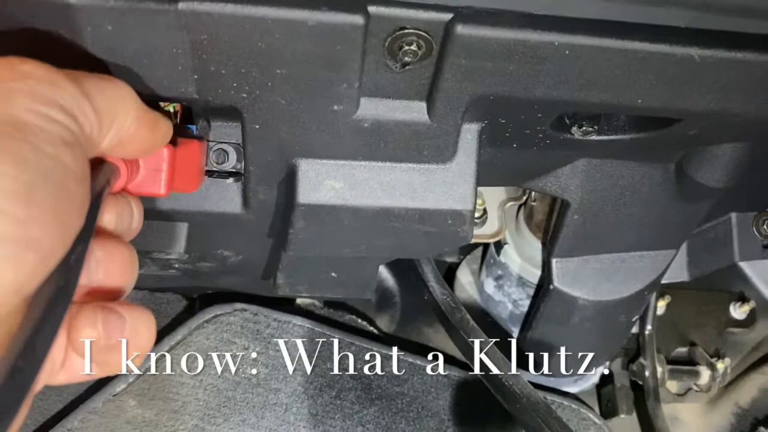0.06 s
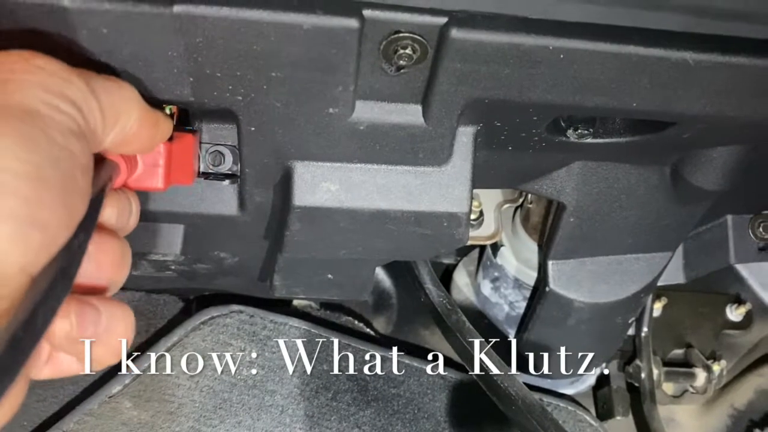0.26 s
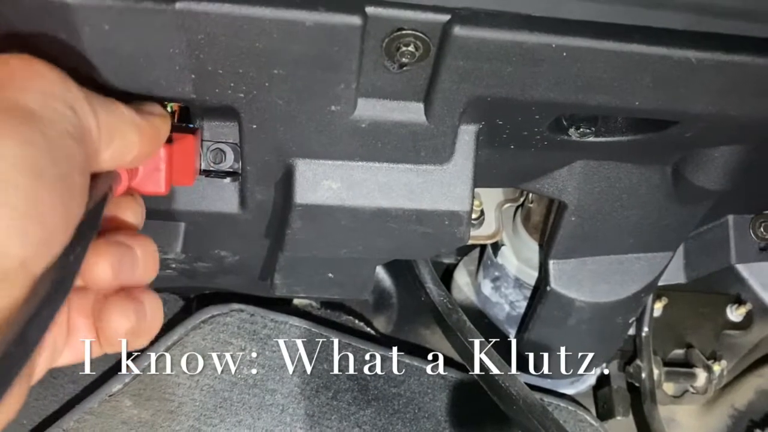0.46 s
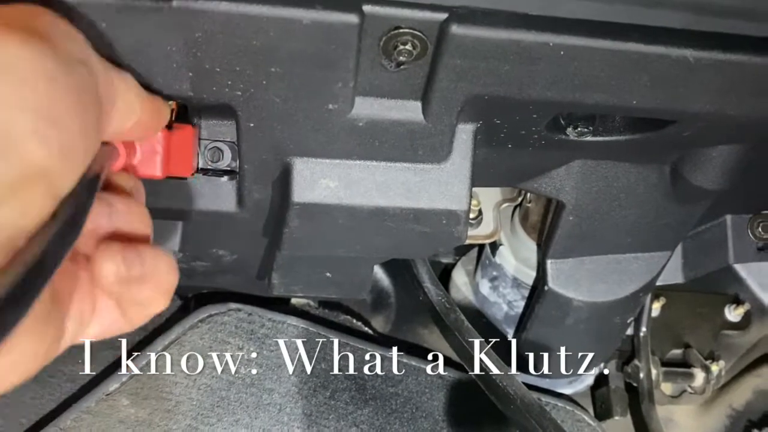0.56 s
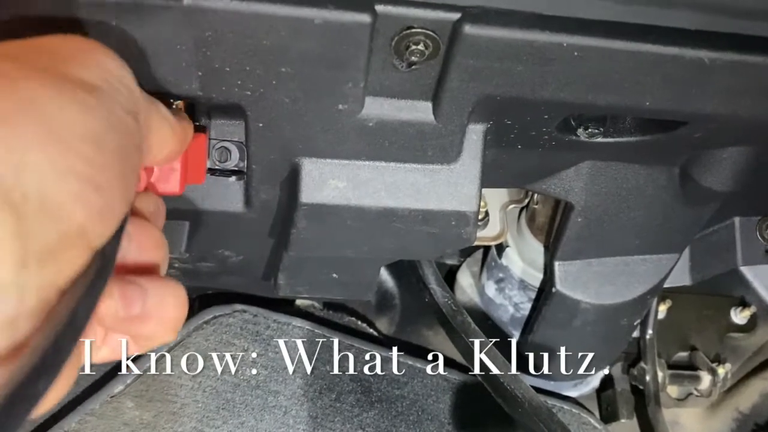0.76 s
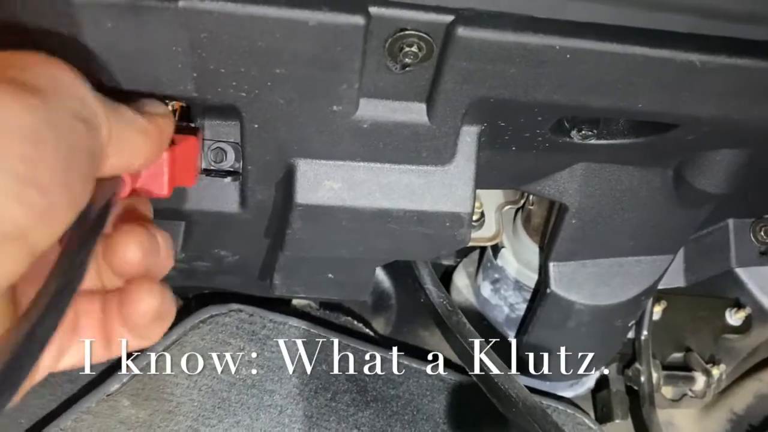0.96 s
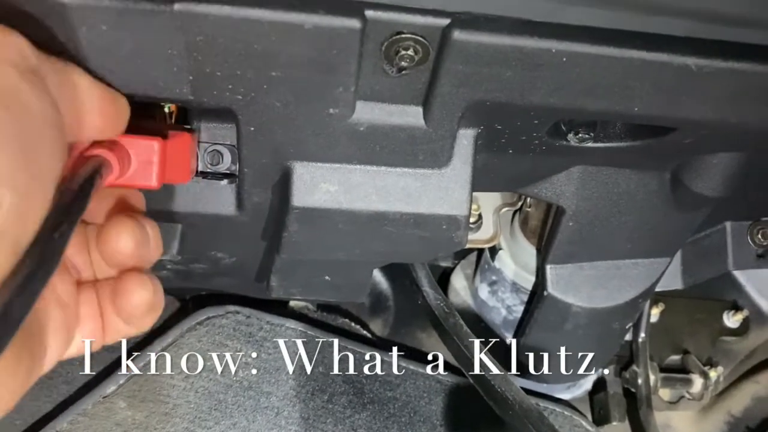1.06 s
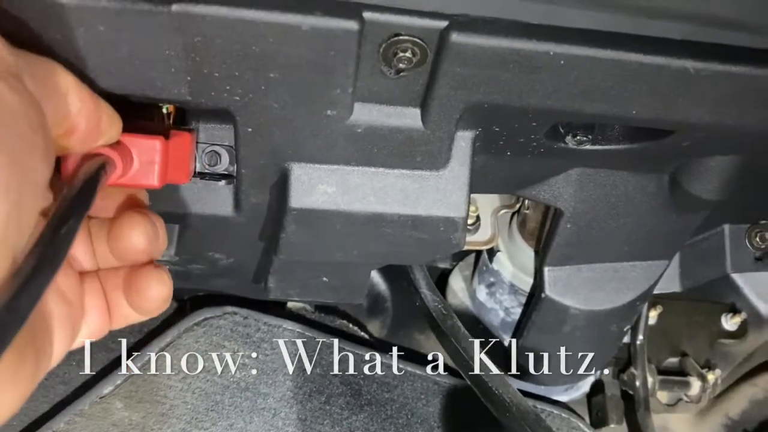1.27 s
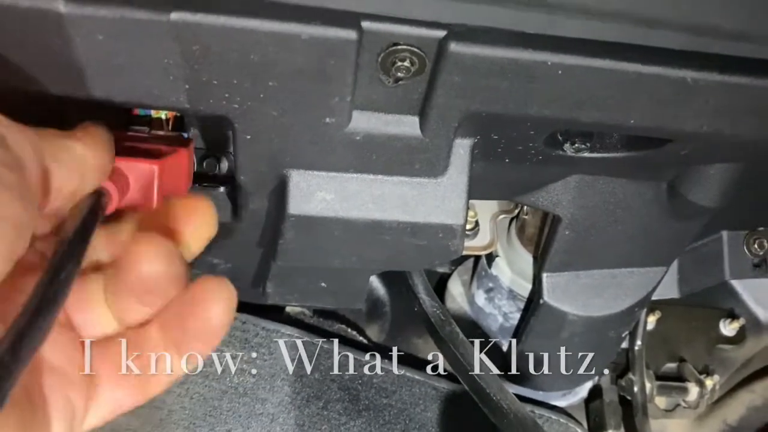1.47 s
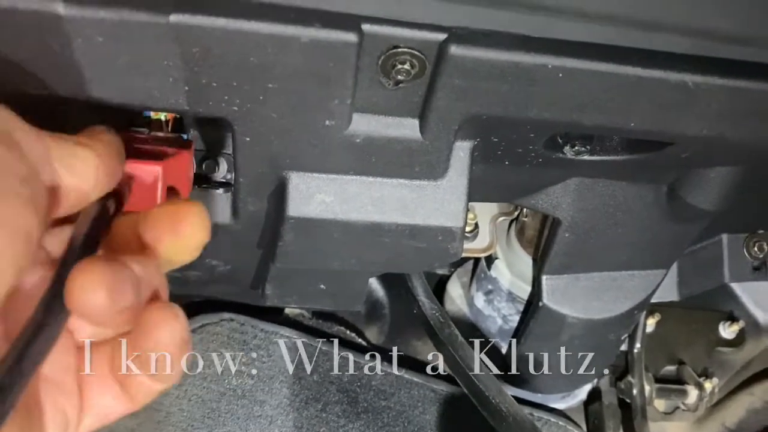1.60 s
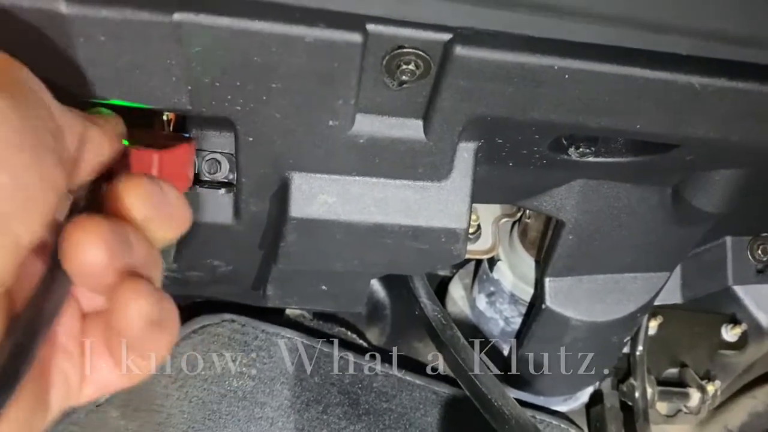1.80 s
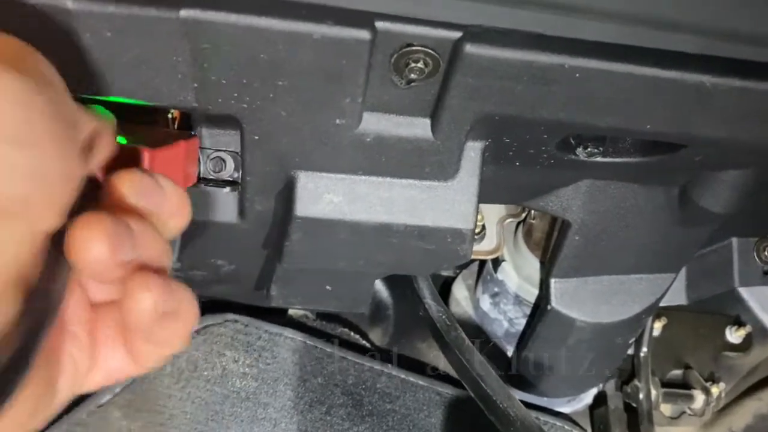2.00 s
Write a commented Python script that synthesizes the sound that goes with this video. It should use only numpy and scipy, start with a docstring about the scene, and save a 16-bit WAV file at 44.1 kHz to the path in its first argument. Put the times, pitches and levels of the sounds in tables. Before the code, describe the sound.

A plastic plug is worked in a socket, close to a stereo microphone: strong clacks and low panel thumps at the start, another cluster of clicks mid-way, then faint ticks and rubbing, over steady low vehicle cabin hum.

```python
"""A low cabin hum and rumble run throughout, under plastic rubbing: a plug is at a socket under a dashboard.
Close to a two-port microphone its shell ticks, scrapes on the rim and knocks home; a trim panel thumps.
Shaped noise makes rumble, hiss, rubbing, scrapes and clicks; sines make the hum and, decaying, ring the
shell, housing and panel. Short footwell reflections follow the clicks, shell rings and knocks only."""
import sys
import numpy as np
from scipy import signal
from scipy.fft import rfft, irfft, next_fast_len
from scipy.io import wavfile
from scipy.ndimage import map_coordinates

SR = 44100
rng = np.random.default_rng(int(sys.argv[2]) if len(sys.argv) > 2 else 0)


def persist_wave(psi):
    """Save psi, clipped to +-1, as 16-bit WAV."""
    counts = np.round(np.clip(psi, -1, 1) * 32767).astype(np.int16)
    wavfile.write(sys.argv[1], SR, np.atleast_2d(counts).T)


N = 90052  # length in samples


def amp(db):
    """Decibels to gain."""
    return 10 ** (np.asarray(db) / 20)


def unit(x):
    """Scale to rms 1."""
    return x / np.sqrt(np.mean(x ** 2) + 1e-20)


def along(points, hz):
    """Read (frequency, value) points on a logarithmic frequency axis."""
    point_hz, values = np.transpose(points)
    return np.interp(np.log(hz + 1), np.log(point_hz + 1), values)


def curves(rows):
    """One value per sample for each column after the time."""
    times, *columns = np.transpose(rows)
    return [np.interp(np.arange(N) / SR, times, column) for column in columns]


def wobble(rate):
    """A smooth random curve with this many knots a second."""
    knots = rng.standard_normal(int(N * rate / SR) + 4)
    return map_coordinates(knots, [np.arange(N) * rate / SR])


def swell(start, length):
    """A smooth rise and fall: half a sine over the length in seconds."""
    return np.sin(np.pi * np.clip((np.arange(N) / SR - start) / length, 0, 1))


def filtered(x, response):
    """Multiply the spectrum of x by a complex response of frequency."""
    size = next_fast_len(N + SR // 4)  # room for the filter to ring out
    spectrum = rfft(x, size) * response(np.fft.rfftfreq(size, 1 / SR))
    return irfft(spectrum, size)[..., :N]


# how alike the left and right ports hear a sound: (frequency [Hz], likeness [0 to 1])
LIKENESS = [(150, 1), (350, 0.83), (600, 0.12), (1000, 0.78), (3000, 0.44), (4800, .5), (7000, 1)]


def coloured(pair, spectrum):
    """Two unrelated signals become one stereo sound of rms 1, its ports alike by frequency."""
    def mid_side_response(hz):
        angle = np.arccos(np.clip(along(LIKENESS, hz), -1, 1)) / 2
        return amp(along(spectrum, hz)) * [np.cos(angle), np.sin(angle)]

    mid, side = filtered(pair, mid_side_response)
    return unit(np.array([mid + side, mid - side]))


def noise(spectrum):
    """Stereo noise of rms 1 with this spectrum."""
    return coloured(rng.standard_normal((2, N)), spectrum)


def strike(start, rise_s, t60):
    """Time since a blow, and its envelope: a fast rise, then a 60 dB fall in t60 seconds."""
    t = np.arange(N) / SR - start
    envelope = np.zeros(N)
    on = (t > 0) & (t < 2 * t60)
    envelope[on] = (1 - np.exp(-t[on] / rise_s)) * amp(-60 * t[on] / t60)
    return t, envelope


# spectrum of the cabin's rumble: (frequency [Hz], relative level [dB])
RUMBLE_SPECTRUM = [(13, -45), (22, -50), (42, -2.5), (81, 2), (114, 0.5), (168, -8), (193, -9.5), (248, -8),
                   (272, -13.5), (395, -28.5), (476, -27.5), (574, -36), (900, -53), (1170, -51),
                   (1980, -120)]
# slow rise and fall of the rumble: (time [s], level about RUMBLE_DB [dB])
RUMBLE_SWAY = [(0, 5.5), (.25, 1.5), (.7, -1.5), (1.25, 0), (1.5, 4), (1.7, 3), (1.9, 0.5), (2.04, 4)]
# steady tones of the hum: (frequency [Hz], rms level [dB])
HUM_TONES = [(102, -49), (116, -46.5), (242, -54.5)]
# spectrum of the faint hiss: (frequency [Hz], relative level [dB])
HISS_SPECTRUM = [(200, -14), (600, 5), (1500, -9), (5000, -15), (16000, -31.5)]
RUMBLE_DB, HISS_DB = -40, -71.5


def cabin(drift_rad=0.76):
    """All round the cabin: swaying low rumble, hum tones wavering in phase, and faint hiss."""
    t = np.arange(N) / SR
    hum = np.zeros(N)
    for hz, db in HUM_TONES:
        phase = 2 * np.pi * hz * t + drift_rad * wobble(8.63)
        hum += amp(db) * np.sqrt(2) * np.sin(phase)
    rumble = amp(RUMBLE_DB + curves(RUMBLE_SWAY)[0]) * noise(RUMBLE_SPECTRUM)
    return hum + rumble + amp(HISS_DB) * noise(HISS_SPECTRUM)


# rubbing of plug, fingers and cable, before each layer's own trim:
# (time [s], level of the middle [dB], level of the treble [dB])
RUBBING = [(0, -44.5, -60), (.06, -55, -79), (.1, -60, -72), (.13, -55.5, -100), (.16, -51, -82),
           (.21, -55, -72.5), (.24, -52, -71), (.32, -65, -101), (.35, -57, -73.5), (.46, -63.5, -82),
           (.5, -56.5, -70), (.57, -58, -71), (.62, -63, -81), (.68, -58.5, -70), (.77, -49.5, -87),
           (.8, -64, -86), (.87, -69.5, -100), (.94, -58.5, -70), (1.01, -67, -75.5), (1.08, -61.5, -67),
           (1.15, -66.5, -76), (1.18, -55, -69), (1.21, -71.5, -79), (1.28, -89.5, -90.5),
           (1.36, -53, -66.5), (1.4, -65, -64.5), (1.455, -56, -62), (1.49, -71, -72), (1.58, -69.5, -70),
           (1.64, -61, -63.5), (1.7, -62, -69), (1.77, -69.5, -82), (1.82, -58, -64.5), (1.85, -47.5, -68),
           (1.89, -66, -78), (1.94, -68, -90), (1.98, -94, -104), (2.04, -48.5, -52.5)]
# spectrum of plastic scraping on plastic: (frequency [Hz], relative level [dB])
SCRAPE_SPECTRUM = [(150, -5), (400, 6.5), (650, 3.5), (1100, 4), (1700, -2.5), (3200, -3.5), (5200, -11),
                   (7000, -20.5), (16000, -30.5)]
# spectrum of skin on plastic: (frequency [Hz], relative level [dB])
SKIN_SPECTRUM = [(2000, -47), (5000, 13), (7000, 5.5), (12000, 6), (16000, 1.5)]
SLIPS_PER_S, SLIP_SHARE = 500, 0.22  # tiny slips a second, and their share of the friction's power


def rubbing(scrape_db=-1, skin_db=2, uneven_db=0.5):
    """Close by: tiny random slips of plastic on plastic, with the smoother swish of skin."""
    middle_db, treble_db = curves(RUBBING)
    slips = unit((rng.random(N) < SLIPS_PER_S / SR) * rng.standard_normal((2, N)))
    smooth = rng.standard_normal((2, N))
    friction = np.sqrt(SLIP_SHARE) * slips + np.sqrt(1 - SLIP_SHARE) * smooth
    scrape_level = amp(middle_db + scrape_db + uneven_db * wobble(58.9))
    scrape = scrape_level * coloured(friction, SCRAPE_SPECTRUM)
    return scrape + amp(treble_db + skin_db) * noise(SKIN_SPECTRUM)


def grit(per_s=45, level_db=-8, t60=0.032):
    """Sparse micro-contacts, each a dying burst of noise, crackle under the rubbing."""
    t = np.arange(SR // 20) / SR
    catches = (rng.random(N) < per_s / SR).astype(float)
    envelope = unit(signal.fftconvolve(catches, amp(-60 * t / t60))[:N])
    middle_db, treble_db = curves(RUBBING)
    crackle = amp(middle_db) * noise(SCRAPE_SPECTRUM) + amp(treble_db) * noise(SKIN_SPECTRUM)
    return amp(level_db) * envelope * crackle


# modes of the socket's housing: (frequency [Hz], relative level [dB])
HOUSING_MODES = [(465, -1), (533, 1), (614, 5.5), (720, -3.5), (976, 1), (1076, -1.5), (1220, -6),
                 (1400, -6.5), (1560, 3.5), (1818, 0.5), (1930, -6), (2364, -19)]
HOUSING_T60_S = .06
# the hand shifts its grip and the housing groans softly: (time [s], length [s], level [dB])
GRIP_SHIFTS = [(0.041, 0.052, -55.5), (0.554, 0.065, -60), (1.38, 0.11, -54.5), (1.62, 0.14, -60.5),
               (1.829, 0.056, -61)]
# spectrum of the catches under the grip: (frequency [Hz], relative level [dB])
GRIP_SPECTRUM = [(250, -14), (460, 5.5), (620, 13), (1100, -5), (2500, -27), (5000, -32)]


def groan(rub_db=-9, catches_per_s=220):
    """Rubbing and shifts of grip catch and slip, each catch ringing the housing."""
    t = np.arange(SR // 8) / SR
    housing_ring = np.zeros(len(t))
    for hz, db in HOUSING_MODES:
        housing_ring += amp(db - 60 * t / HOUSING_T60_S) * np.sin(2 * np.pi * hz * t)
    catches = (rng.random(N) < catches_per_s / SR) * np.sign(rng.standard_normal((2, N)))
    catches = coloured(catches, GRIP_SPECTRUM)
    ring = unit(signal.fftconvolve(catches, housing_ring[None], axes=1)[:, :N])
    level = amp(curves(RUBBING)[0] + rub_db)
    for start, length, db in GRIP_SHIFTS:
        level += amp(db) * swell(start, length)
    return ring * level


# the shell drags along the rim: (time [s], length [s], level [dB], resonance [Hz])
RIM_DRAGS = [(.002, 0.015, -49, 2800), (0.472, 0.013, -56, 4960), (0.505, 0.029, -52.5, 4060),
             (1.16, 0.032, -56, 5030), (1.821, 0.062, -63, 3100)]
# spectrum of bright plastic contact: (frequency [Hz], relative level [dB])
CLACK_SPECTRUM = [(700, -44), (1700, 1.5), (2400, 3.5), (3400, 0), (5200, -0.5), (6500, -10.5),
                  (9000, -17.5), (16000, -55)]


def drags(width_hz=1600, chatter_db=2):
    """At the rim: short, bright scrapes of noise through one broad resonance of the shell."""
    out = np.zeros((2, N))
    for start, length, db, centre_hz in RIM_DRAGS:
        def resonance(hz):
            damping = 1j * hz * width_hz
            return damping / (centre_hz ** 2 - hz ** 2 + damping)

        band = filtered(noise(CLACK_SPECTRUM), resonance)
        out += amp(db + chatter_db * wobble(250)) * swell(start, length) * unit(band)
    return out


# plug against socket: (time [s], hollow body level [dB], bright clack level [dB], sharp snap level [dB],
# decay t60 before each layer's hold factor [s], shell ring level [dB], centre of that ring [Hz])
CONTACTS = [(.011, -36, -41.5, -75, 0.026, -41, 3140), (0.041, -28.5, -45, -53, 0.018, -29, 3620),
            (0.0411, -35, -37.5, -60, 0.027, -40.5, 5100), (0.113, -48, -62, -82, 0.046, -57, 4980),
            (.137, -38, -47.5, -75, 0.086, -48, 3930), (0.1625, -46, -36.5, -59, .05, -42, 3040),
            (.178, -32, -39, -66, 0.031, -27.5, 2490), (0.179, -49, -32.5, -42, 0.023, -25.5, 3360),
            (0.373, -44.5, -42, -39.5, 0.024, -45.5, 2700), (.426, -52, -53, -53.5, 0.029, -55, 2400),
            (0.4777, -64, -50, -63, 0.12, -51.5, 4800), (0.5439, -40, -62, -74, 0.033, -58, 2370),
            (.583, -43, -59, -65, 0.027, -49.5, 2380), (.647, -50, -68, -62, 0.027, -57.5, 4370),
            (0.6861, -39, -30, -44, 0.047, -32, 3050), (0.6882, -48, -30.5, -45, 0.032, -32, 4630),
            (0.721, -43, -37, -32.5, 0.053, -35, 2420), (0.7467, -39, -42, -45.5, 0.083, -41, 2390),
            (0.7539, -28, -35, -48, 0.052, -45, 2400), (.765, -38, -54, -50, 0.035, -45, 3050),
            (.804, -50, -61, -82, 0.053, -55, 2380), (1.038, -67, -50.5, -52.5, 0.033, -58, 3150),
            (1.044, -49, -52, -66, 0.025, -53.5, 3320), (1.087, -47.5, -56, -75, 0.032, -60, 3200),
            (1.361, -41, -45, -55, 0.019, -49, 3330), (1.4661, -53, -51, -40, 0.02, -48, 2920),
            (1.5, -53, -55, -56, 0.04, -55, 3360), (1.5399, -57, -41.5, -40, 0.02, -41.5, 2940),
            (1.5397, -62, -49, -44, .015, -40.5, 8086), (1.628, -48.5, -55, -67, .024, -55, 4630),
            (1.713, -47.5, -51.5, -58, .022, -62, 2400), (1.790, -48, -51.5, -69, 0.047, -53.5, 3560),
            (1.843, -44.5, -59, -60, 0.041, -54, 3010), (1.869, -52.5, -53, -58, 0.044, -52, 3220),
            (1.963, -51.5, -59, -67, 0.032, -54.5, 2350), (1.972, -58, -58, -59, 0.062, -53, 5480),
            (1.999, -53, -49.5, -49.5, .019, -45.5, 5400)]
# spectrum of the hollow body: (frequency [Hz], relative level [dB])
BODY_SPECTRUM = [(200, -48), (450, 1.5), (620, 1.5), (800, 0), (1050, 6.5), (1500, -6.5), (2200, -37),
                 (5000, -60)]
# spectrum of the sharp snap: (frequency [Hz], relative level [dB])
SNAP_SPECTRUM = [(3000, -38), (5500, 2), (9000, 10.5), (12000, 8), (16000, 2.5)]


def clicks(rise_s=0.00071, snap_rise_s=0.0006, snap_hold=0.79):
    """Each contact excites dense, quickly dying plastic resonances in three ranges."""
    layers = [(BODY_SPECTRUM, rise_s, 1), (CLACK_SPECTRUM, rise_s, 1), (SNAP_SPECTRUM, snap_rise_s, snap_hold)]
    out = np.zeros((2, N))
    for k, (spectrum, rise, hold) in enumerate(layers):
        power = np.zeros(N)  # overlapping contacts add in power
        for start, *levels, t60, _, _ in CONTACTS:
            _, envelope = strike(start, rise, t60 * hold)
            power += (amp(levels[k]) * envelope) ** 2
        out += np.sqrt(power) * noise(spectrum)
    return out


def near(hz, centre_hz, octaves):
    """Where a blow lands favours the modes around one frequency."""
    return np.exp(-.5 * (np.log2(hz / centre_hz) / octaves) ** 2)


def mode(hz, t, apart_rad=.33):
    """One mode as a sine, reaching the two ports somewhat out of step."""
    start_turns = rng.random()
    apart = apart_rad * rng.normal() * np.array([[1], [-1]])
    return np.sin(2 * np.pi * (hz * t + start_turns) + apart)


# modes of the plug's shell: frequency [Hz]
SHELL_MODES = [2346, 2714, 3106, 3415, 3960, 4484, 4940, 5310, 7940]
SHELL_SPREAD_OCT = 0.11


def shell(rise_s=0.00037, ring_hold=1.07):
    """Where the plug is struck decides which modes of its shell ring out; a tight grip damps them."""
    out = np.zeros((2, N + SR))  # spare second for the last rings
    t = np.arange(SR // 10) / SR
    for start, *_, t60, db, centre_hz in CONTACTS:
        ring = sum(near(hz, centre_hz, SHELL_SPREAD_OCT) * mode(hz, t) for hz in SHELL_MODES)
        envelope = amp(db - 60 * t / (t60 * ring_hold)) * (1 - np.exp(-t / rise_s))
        first = round(start * SR)
        out[:, first:first + len(t)] += envelope * ring
    return out[:, :N]


# firm knocks of the plug into the housing: (time [s], level [dB], centre [Hz], spread [octaves])
FIRM_KNOCKS = [(.0412, -31, 469, 0.29), (.0418, -34.5, 1330, 0.17), (.164, -33.5, 833, 0.33),
               (.1775, -32, 1040, 0.2), (.7523, -31.5, 1010, 1.16), (.7635, -40, 770, 0.77),
               (1.425, -43, 468, 0.17), (1.504, -44, 477, 0.29), (1.964, -50, 610, 0.21)]


def housing(scatter_db=1, rise_s=0.00062):
    """The socket rings briefly at each firm knock, low or high by where it is hit."""
    out = np.zeros((2, N))
    for start, db, centre_hz, octaves in FIRM_KNOCKS:
        t, envelope = strike(start, rise_s, HOUSING_T60_S)
        on = envelope > 0
        ring = 0
        for hz, level in HOUSING_MODES:
            gain = amp(level + scatter_db * rng.normal()) * near(hz, centre_hz, octaves)
            ring = ring + gain * mode(hz, t[on])
        out[:, on] += amp(db) * envelope[on] * ring
    return out


# the hand flexes the trim panel: (time [s], level before a shared lift [dB], pitch [Hz])
PANEL_THUMPS = [(.054, -25.5, 223.4), (0.1156, -28.5, 246), (0.141, -21.5, 218.5), (0.1512, -24, 198.8),
                (0.1695, -14, 198), (0.1825, -16, 221), (0.347, -32.5, 238.4), (.762, -25, 190.4),
                (.778, -34.5, 146), (1.4428, -25.5, 207), (1.5032, -21.5, 238.5), (1.51, -30.5, 148),
                (1.534, -31, 148), (1.293, -29.5, 113), (1.345, -30.5, 116)]
# modes of the panel: (ratio to the pitch, relative level [dB])
PANEL_MODES = [(0.522, -6.5), (1.001, 1.5), (1.5, -37), (2.3, -26)]
THUMP_RISE_S, THUMP_T60_S, THUMP_LIFT_DB = 0.0037, 0.054, 4


def panel():
    """Soft, low thumps under the hand: a few heavily damped modes of the trim, equal at both ports."""
    out = np.zeros(N)
    for start, db, hz in PANEL_THUMPS:
        t, envelope = strike(start, THUMP_RISE_S, THUMP_T60_S)
        ring = sum(amp(level) * np.sin(2 * np.pi * hz * ratio * t) for ratio, level in PANEL_MODES)
        out += amp(db + THUMP_LIFT_DB) * envelope * ring
    return out


def footwell(x, wet_db=-16, t60=0.09):
    """Short, dry reflections under the dashboard: a decaying noise tail, softened in the treble."""
    t = np.arange(SR // 5) / SR
    tail = rng.standard_normal((2, len(t))) * amp(-60 * t / t60) * (t > .003)  # 3 ms before the first
    tail = signal.sosfilt(signal.butter(1, 5000, fs=SR, output="sos"), tail)
    tail = tail / np.linalg.norm(tail[0])
    return x + amp(wet_db) * signal.fftconvolve(x, tail, axes=1)[:, :N]


def scene():
    """Plug, panel and hand in the humming cabin; only the sharp contacts get reflections."""
    contacts = footwell(clicks() + shell() + housing())
    hand = panel() + rubbing() + grit() + drags() + groan()
    return contacts + hand + cabin()


# response of the microphone: (frequency [Hz], level [dB])
MICROPHONE_RESPONSE = [(20, -2), (5800, -1.5), (14500, -2.5), (15600, -1), (16100, -21)]
# how much louder the left port is than the right: (frequency [Hz], difference [dB])
LEFT_LOUDER_DB = [(400, 0), (630, 5.5), (1000, -1), (2400, 0), (3400, 0.5), (4300, -1.5), (5500, 0)]
# phase by which the left port leads the right: (frequency [Hz], lead [radians])
LEFT_LEAD_RAD = [(200, 0), (2000, .4), (5200, .75), (7400, 3.1), (10500, 6.3), (13600, 9.4), (16000, 11.8)]
TOP_HZ = 16500


def record(dry):
    """Two microphone ports differing in level and phase, the left leading, and a band limit."""
    half = np.array([[1], [-1]]) / 2  # each port takes half of the difference

    def response(hz):
        level = amp(half * along(LEFT_LOUDER_DB, hz))
        phase = np.exp(1j * half * along(LEFT_LEAD_RAD, hz))
        return amp(along(MICROPHONE_RESPONSE, hz)) * level * phase * (hz < TOP_HZ)

    return filtered(dry, response)


dry = scene()
out = record(dry)
persist_wave(out)
```